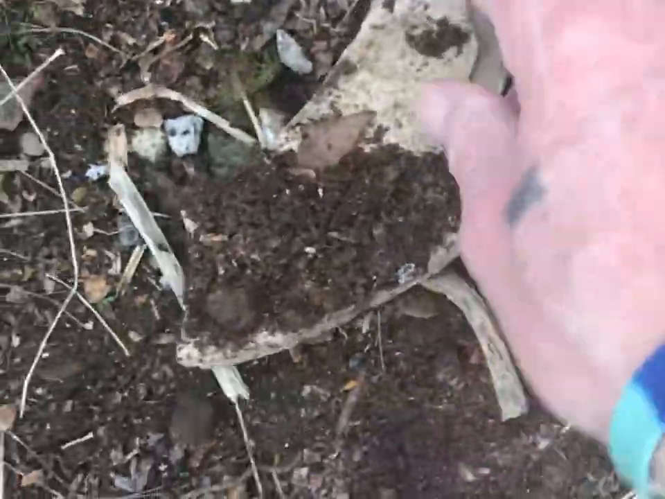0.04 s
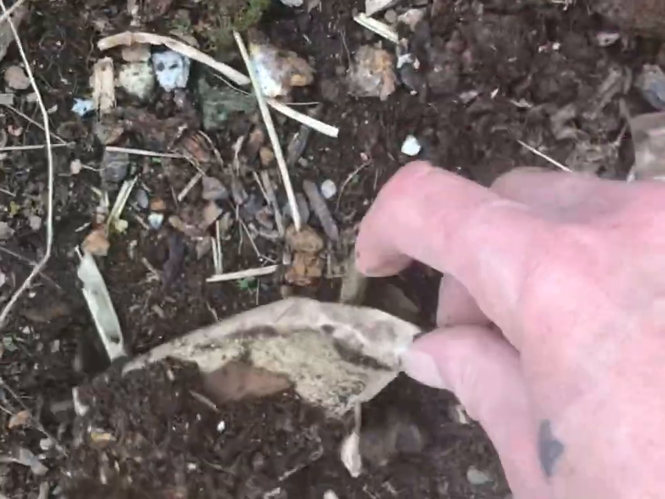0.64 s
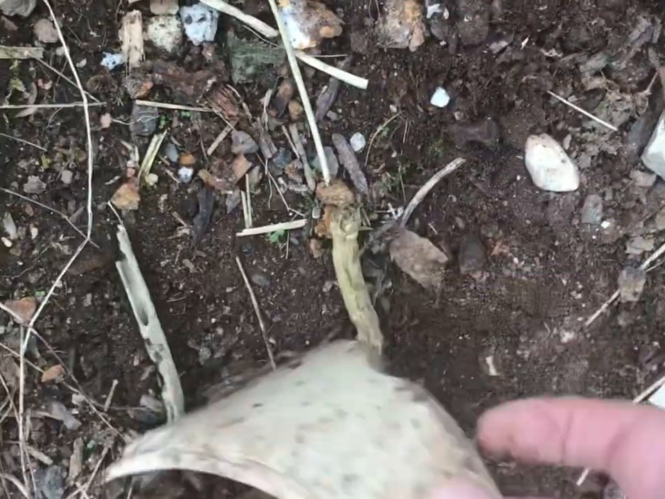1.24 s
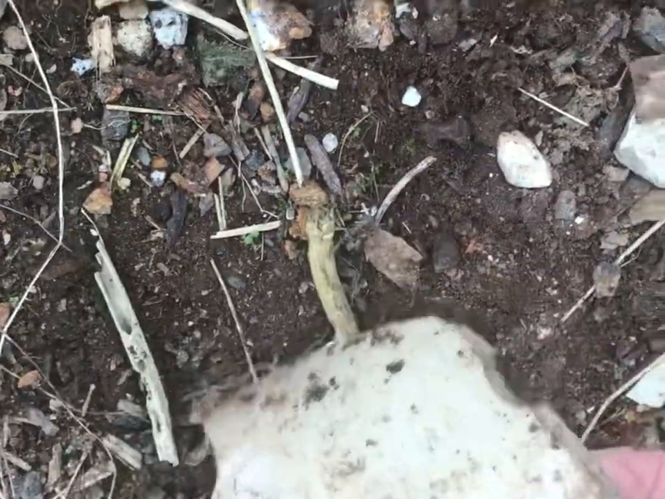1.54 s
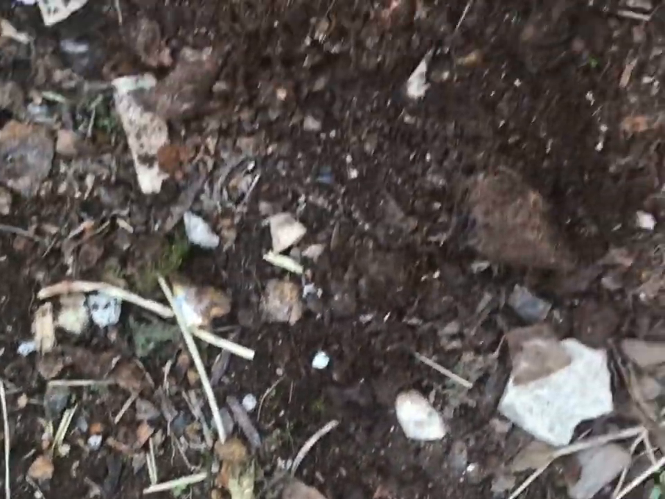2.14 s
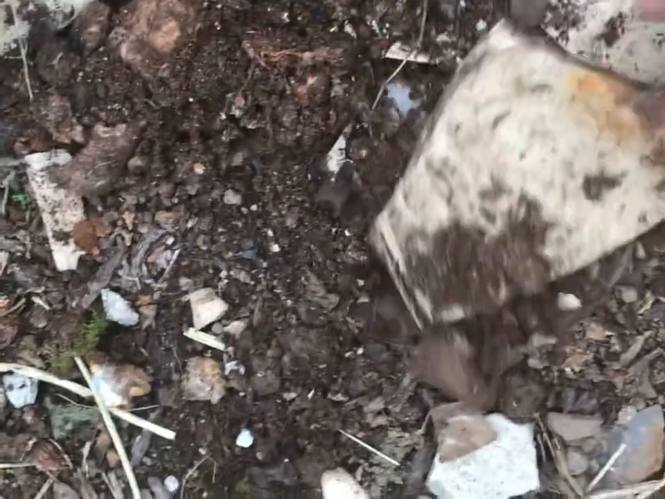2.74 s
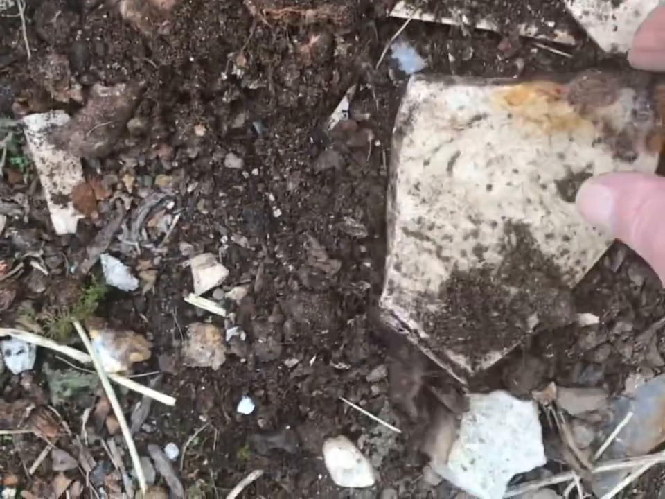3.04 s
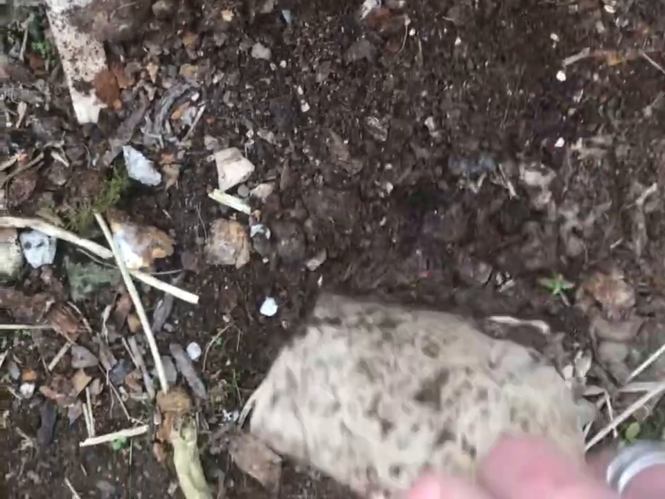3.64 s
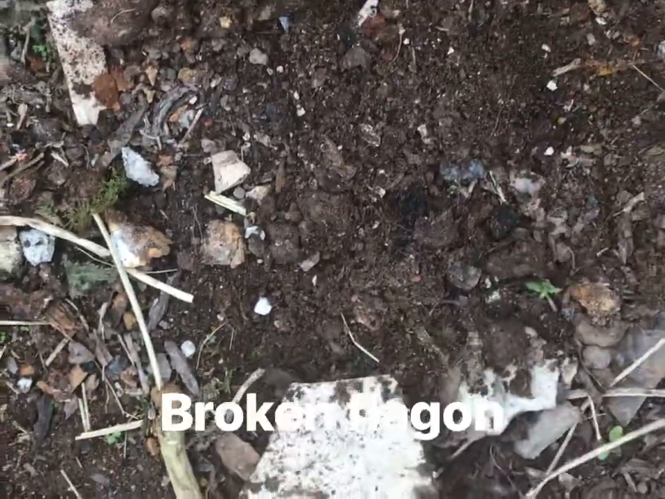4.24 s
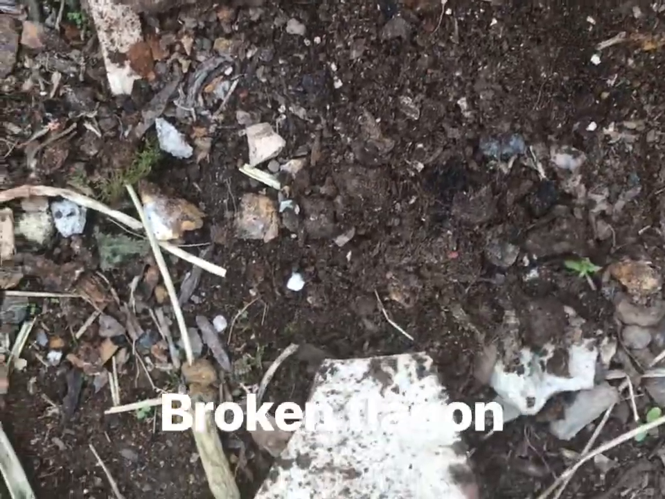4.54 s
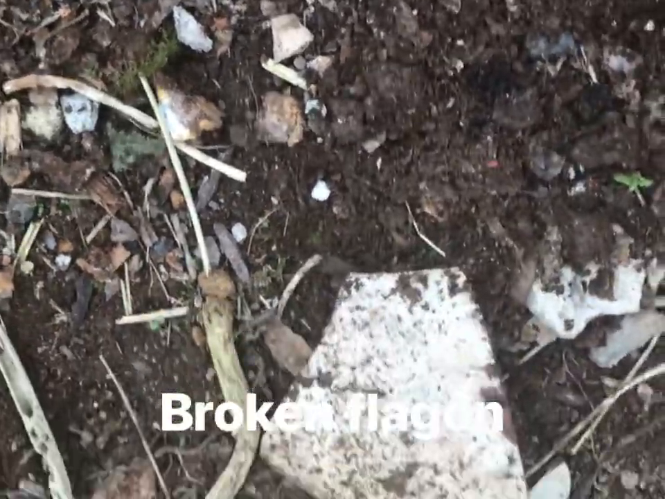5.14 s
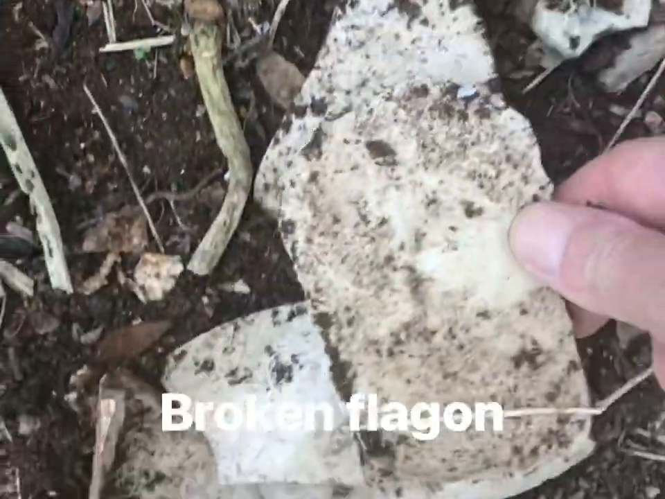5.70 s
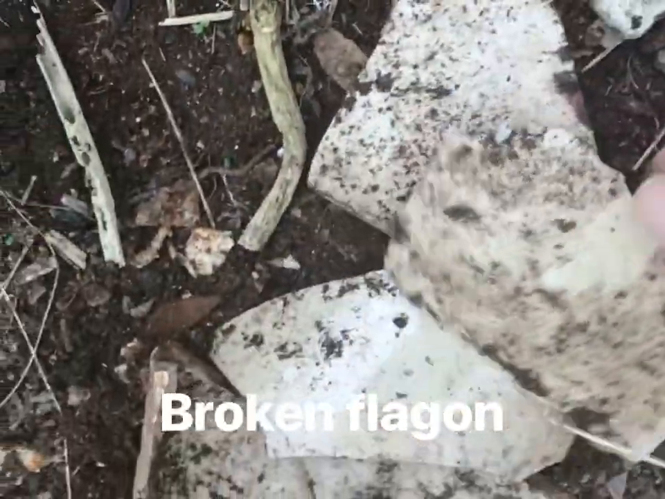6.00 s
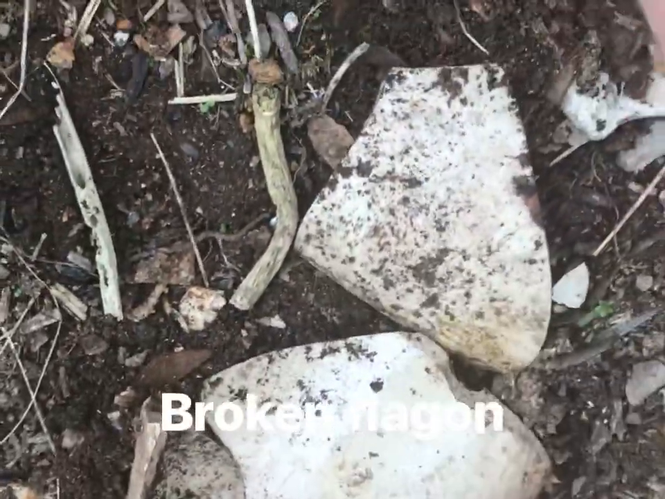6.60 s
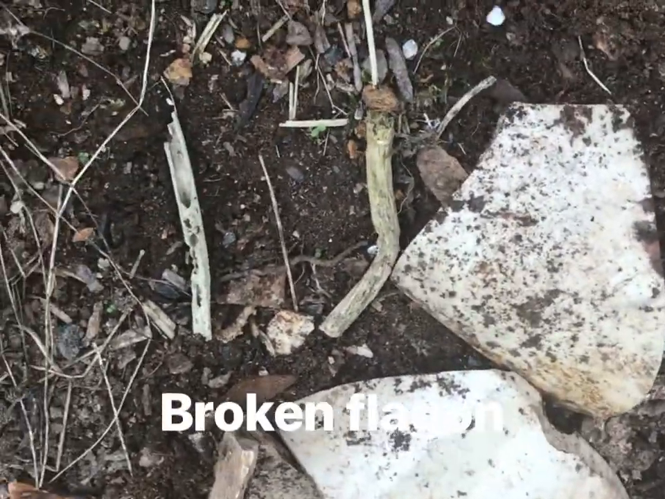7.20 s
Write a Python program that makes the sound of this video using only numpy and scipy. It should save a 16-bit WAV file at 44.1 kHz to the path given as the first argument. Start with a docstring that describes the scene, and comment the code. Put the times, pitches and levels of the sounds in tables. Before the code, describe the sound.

Close, bright clinks of stoneware pieces picked out of garden dirt, with gritty scraping, rustling dry stalks and a short final clatter.

```python
"""In a quiet garden a hand picks four pieces of a broken stoneware jug out of the soil, close by.
First the rim, then a chip, the wall and the belly are knocked and dragged over grit: impact and friction
excite each shard's own modes, while crumbs of earth and dry stalks rustle underneath.
Laid together at the end, the shards clink on one another and one slides off, rattling.
A last rustle of dry litter follows."""
import sys
import numpy as np
from scipy import signal
from scipy.io import wavfile
from scipy.ndimage import map_coordinates

SR = 44100
rng = np.random.default_rng(int(sys.argv[2]) if len(sys.argv) > 2 else 0)


def unload_audio(sound):
    """Save the sound as a 16-bit wav file, at the path given as the first command line argument."""
    columns = np.transpose(np.atleast_2d(sound))
    # keep every value between -1 and 1, then stretch to whole-number steps
    steps = np.round(np.clip(columns, -1, 1) * 32767)
    wavfile.write(sys.argv[1], SR, steps.astype(np.int16))


N = 320166
TIME = np.arange(N) / SR
RING_TIME = np.arange(8192) / SR

# normal modes of each shard, which shift with how it is supported: pitch_hz, level_db, t60_s
SHARD_MODES = { "rim": [(3615, 0, .024), (4200, -10, .008), (5840, -4, .04), (8470, -14, .03),
               (10400, -15, .028), (13500, -24, .02)], "rim, wedged": [(3430, -5, 0.021),
               (4280, 1.5, 0.0096), (6820, -8, 0.018), (8040, -1.5, .022), (12130, -19.5, .02)],
               "rim, gripped": [(2970, 1.5, 0.04), (5770, -5, 0.034), (6460, -12, 0.023)],
               "rim, grounded": [(1083, -15, 0.061), (1800, -8.5, 0.016), (3946, 0.5, 0.034),
               (4830, 5.5, 0.014), (6070, -4.5, 0.019), (8600, -6, 0.02), (10370, -12, 0.014)],
               "wall": [(2690, -10.5, .036), (4030, -8.5, .032), (6150, -3, .026), (6400, 0, .026),
               (9050, -5, .024), (11000, -12, .018), (12200, -9, .022), (14000, -14, .022)],
               "chip": [(2970, -11, .035), (5800, -11, .02), (6200, -8, .026), (6530, 0, .026),
               (10150, -15, .018), (11470, -7, .02), (12190, -18, .02)], "belly": [(4150, 0, .05),
               (4835, -6, .035), (6220, -14, .018), (6560, -17, .02), (9230, -13, .02), (10250, -20, .022),
               (11350, -19, .014)], "belly, sliding": [(4165, 0, .032), (4835, -1, .032), (6210, -6, .028),
               (6580, -7, .026), (9230, -3, .028), (10300, -12, .028), (11280, -11, .02),
               (13500, -14, .026)], "belly, pressed": [(4190, 0, .019), (4800, -5, .014), (9240, -6, .02),
               (10250, -8, .02), (11130, -13, .018)], "flake": [(8020, 0, 0.016)], }
# pushes of each shard over the ground, which both rub the shard and stir the soil:
# start_s, length_s, crest_fraction, rub_db, brightness_db_per_octave, soil_db
SHARD_MOVES = { "rim": [(.004, 0.08, 0.35, -31, -4, -43), (.09, 0.043, 0.7, -39, 5, -52),
               (6.33, 0.15, 0.4, -37.5, 6.5, -48.5)], "rim, gripped": [(.29, 0.38, 0.61, -54, 36, -55),
               (.94, 0.25, 0.3, -52.5, 14, -62)], "chip": [(1.58, 0.23, 0.74, -59, 0, -68),
               (1.825, 0.1, 0.5, -43.5, 0, -52.5), (2.0, 0.076, 0, -53.5, -8, -65),
               (3.87, 0.092, 0, -52, -8, -56)], "wall": [(2.29, 0.12, 0.03, -52.5, -6.5, -66),
               (2.41, 0.072, 0.9, -44, -9, -58), (2.52, 0.32, 0.4, -58.5, -4, -63),
               (2.905, 0.021, 0.36, -53.5, -2.5, -63.5), (3.02, 0.27, 0.12, -56, 0.5, -63),
               (3.5, 0.15, 0.8, -54, -3, -62), (3.69, 0.11, 0.95, -49.5, -1.5, -66)],
               "belly, pressed": [(4.405, 0.26, 0.43, -41.5, -1, -51.5),
               (4.73, 0.068, 0.72, -43, 2.5, -52.5), (4.935, 0.095, 0, -51.5, -14, -70)],
               "belly, sliding": [(5.06, 0.067, 0.5, -56.5, -1, -77), (5.22, 0.43, 0.27, -56, -1, -71),
               (5.925, 0.31, 0.75, -33.5, 0.5, -49.5), (6.27, 0.2, 0.06, -26, -10, -53)], }
# spectrum of the dull knock of a piece being stopped: frequency_hz, level_db
KNOCK_SPECTRUM = [(100, -35), (300, -26.5), (700, -15), (1150, -3), (2200, 0.5), (2700, -2.5),
                  (3700, -18.5), (16000, -54.5)]


def amp(db):
    """Decibels to amplitude ratio."""
    return 10 ** (np.asarray(db) / 20)


def unit(x):
    """Normalisation to an rms of 1."""
    return x / np.sqrt(np.mean(x ** 2) + 1e-20)


def add(mix, start_s, sound):
    """Superposition: a sound joins the mix at start_s."""
    part = mix[max(round(start_s * SR), 0):][:len(sound)]
    part += sound[:len(part)]


def through(x, response):
    """Linear filtering: convolution with an impulse response."""
    return signal.oaconvolve(x, response)[:N]


def click(spectrum, size=4096):
    """Minimum phase: the shortest causal pulse with this spectrum, peak 1."""
    hz, db = np.transpose(spectrum)
    bin_hz = abs(np.fft.fftfreq(size, 1 / SR))
    log_gain = np.log(amp(np.interp(np.log(bin_hz + 1), np.log(hz), db)))
    pulse = np.fft.ifft(np.exp(np.conj(signal.hilbert(log_gain)))).real[:size // 2]
    return pulse / abs(pulse).max()


def grains(per_s, spread_db, limit=3.2):
    """Poisson process: independent impulses of random size and sign."""
    hit = rng.random(N) < per_s / SR
    size = amp(spread_db * np.minimum(rng.exponential(1, N), limit))
    return hit * size * rng.choice([-1, 1], N)


def waver(per_s, depth_db):
    """Random amplitude modulation: a gain that changes about per_s times a second."""
    knots = rng.standard_normal(N // 100)
    return amp(depth_db * np.interp(TIME * per_s, np.arange(len(knots)), knots))


def burst(decay_ms):
    """Exponential decay of a puff of white noise."""
    return rng.standard_normal(len(RING_TIME)) * np.exp(-RING_TIME * 1000 / max(decay_ms, .1))


def push(start, length, crest_fraction, swell_db=9, attack_s=0.023, release_s=0.031):
    """Force envelope of one push of the hand: it takes hold, swells to a crest, eases and lets go."""
    end, crest = start + length, start + length * np.clip(crest_fraction, .02, .98)
    near = (TIME > start - 2 * attack_s) & (TIME < end + 2 * release_s)
    gain, t = np.zeros(N), TIME[near]
    held_db = np.interp(t, [start, crest, end], [-swell_db, 0, -swell_db])
    fade_db = 20 * (np.maximum(start - t, 0) / attack_s + np.maximum(t - end, 0) / release_s)
    gain[near] = amp(held_db - fade_db)
    return gain


def air(level_db=-62):
    """Ambient noise: a low distant rumble and a faint even hiss."""
    # spectrum of the open air: frequency_hz, level_db
    air_spectrum = [(12, -39), (25, -12), (60, 0), (146, -13), (250, -19), (800, -25.5), (2600, -32),
                    (16000, -38)]
    return amp(level_db) * unit(through(rng.standard_normal(N), click(air_spectrum)))


def garden_echoes(x, wet_db=-29, t60_s=0.079, delay_s=0.0074):
    """Scattering: weak echoes from the ground and things nearby follow the direct sound."""
    decay = np.exp(-np.log(1000) * TIME / t60_s) * (TIME > delay_s)
    tail = (grains(per_s=45000, spread_db=-1.5) * decay)[:SR // 2]
    return x + amp(wet_db) * through(x, tail / np.linalg.norm(tail))


def crumbs(sizes=26, decay_cycles=2.2, low_hz=1200, high_hz=15000):
    """Heavily damped oscillators: each size of earth crumb ticks at its own pitch, in its own flurries."""
    out, t = np.zeros(N), RING_TIME[:SR // 200]
    for hz in np.linspace(low_hz, high_hz, sizes):
        tick = np.sin(2 * np.pi * hz * t) * np.exp(-t * hz / decay_cycles)
        ticks = through(grains(per_s=110, spread_db=5.5), tick / np.linalg.norm(tick))
        out += ticks * waver(per_s=50, depth_db=2)
    return unit(out)


def stir(pushes):
    """Incoherent addition: the joint strength of several pushes, whose powers add."""
    return np.sqrt(sum((amp(db) * push(start, length, crest)) ** 2
                       for start, length, crest, *_, db in pushes))


def soil(grit_gain_db=7.0, litter_cutoff_hz=1500):
    """Granular noise: stirred crumbs and sand collide; dry litter sounds thinner and sometimes snaps."""
    # hand or shard brushing the dry litter: start_s, length_s, crest_fraction, level_db
    brushes = [(.14, 0.16, .38, -66), (.66, 0.65, 0.16, -69), (3.36, 0.12, 0.8, -63.5),
               (4.82, 0.097, 0.65, -56.5), (5.07, 0.54, 0.73, -57), (5.6, 0.55, 0.3, -64),
               (6.885, 0.23, 0, -63.5), (7.16, 0.2, 0.19, -58)]
    # crumbs and dry stalks breaking: start_s, level_db, decay_ms
    snaps = [(.445, -27.5, 1.9), (0.795, -34, 1.5), (1.021, -33, 1.8), (1.184, -34, .6), (1.238, -37, 2.5),
             (1.613, -34.5, 4.2), (5.3994, -21, 2.2), (5.447, -44, .6), (5.541, -27.5, 3.1),
             (5.595, -21, 4), (5.776, -33.5, 2.2), (5.798, -24, 4.3), (7.15, -33.5, 4.7)]
    # spectrum of the stirred ground: frequency_hz, level_db
    soil_spectrum = [(100, -31), (300, -9.5), (1000, -8.5), (2300, -9), (5800, -6), (9000, -5.5),
                     (12500, -7.5), (16000, -8)]
    sand = unit(grains(per_s=7000, spread_db=1.5))
    grit = amp(grit_gain_db) * unit((crumbs() + sand) * waver(per_s=170, depth_db=2.6))
    litter = stir(brushes) * grit
    for start, db, decay_ms in snaps:
        add(litter, start, amp(db) * burst(decay_ms) / 2)
    high_pass = signal.butter(1, litter_cutoff_hz, "highpass", fs=SR, output="sos")
    earth = stir(sum(SHARD_MOVES.values(), [])) * grit
    response = click(soil_spectrum)
    return through(earth + signal.sosfilt(high_pass, litter), response / np.linalg.norm(response))


def rasp(gain_db=-5):
    """Friction of rough surfaces: a raw broken edge grates in spurts as its shard is dragged."""
    # shards dragged on a raw broken edge: shard_name
    jagged_shards = ("rim", "belly, pressed")
    # spectrum of the grating edge: frequency_hz, level_db
    rasp_spectrum = [(300, -47), (3000, -6), (4200, -2), (5200, -8.5), (9000, -33)]
    force = sum(amp(rub_db) * push(start, length, crest)
                for shard in jagged_shards for start, length, crest, rub_db, _, _ in SHARD_MOVES[shard])
    spurts = grains(per_s=2300, spread_db=9.0) * waver(per_s=70, depth_db=3.0)
    return amp(gain_db) * force * unit(through(spurts, click(rasp_spectrum)))


def chatter():
    """Intermittent contact: runs of dull ticks and a few hard catches as a shard meets soil or shard."""
    # a dull crunch of soil under a shard, or one edge rattling over another:
    # start_s, length_s, crest_fraction, level_db, knock_pitch_ratio
    tick_runs = [(4.509, 0.023, 0.35, -41, 0.94), (6.157, 0.28, 0.09, -46, 0.64),
                 (6.285, 0.19, 0.3, -35, 0.88)]
    # an edge catching with a dull tick that hardly rings: start_s, peak_db
    catches = [(2.313, -39), (2.409, -44), (3.092, -39.5), (3.9371, -29), (5.011, -43.5), (5.857, -22.5),
               (6.272, -27.5), (6.3121, -12.5), (6.35, -23), (6.364, -22), (6.3985, -18), (6.408, -7),
               (6.4228, -12.5), (6.4377, -34), (6.4675, -35)]
    out, knock = np.zeros(N), click(KNOCK_SPECTRUM)
    for start, length, crest, db, pitch_ratio in tick_runs:
        tick = click([(hz * pitch_ratio, level) for hz, level in KNOCK_SPECTRUM])
        ticks = unit(through(grains(per_s=260, spread_db=2.5), tick))
        out += amp(db) * push(start, length, crest) * ticks
    for start, db in catches:
        add(out, start, amp(db) * knock)
    return out


def ring(shard, brightness, damping=1, spot_db=1.6, spot_detune=.001, brightest_hz=11000):
    """Free vibration: a shard's damped modes, one a row; a harder contact favours the high ones."""
    hz, db, t60 = np.transpose(SHARD_MODES[shard])[:, :, None]
    weight, detune = rng.standard_normal((2, *hz.shape))  # no two contact spots ring alike
    octaves = np.log2(np.minimum(hz, brightest_hz) / hz[0])
    size = amp(db + brightness * octaves + spot_db * weight)
    tones = np.sin(2 * np.pi * hz * (1 + spot_detune * detune) * RING_TIME)
    decay = np.exp(-np.log(1000) * RING_TIME * damping / t60)
    return size / np.linalg.norm(size) * tones * decay


def drags(rub_share=0.42, rise_s=0.00087):
    """Stick-slip excitation: grit catches and slips under a moving shard and drives its modes."""
    out, feeds = np.zeros(N), []
    slips = unit(grains(per_s=900, spread_db=4.0))
    grip = np.minimum(waver(per_s=45, depth_db=7.5), 1.2)  # the edge keeps losing its hold
    # as the contact wanders, each mode is fed in its own fits and starts
    for _ in range(max(map(len, SHARD_MODES.values()))):
        friction = slips + rub_share * rng.standard_normal(N)
        feeds.append(unit(friction * waver(per_s=110, depth_db=3.0) * grip))
    swell = 1 - np.exp(-RING_TIME / rise_s)  # a slip pushes softly, so the ring starts without a click
    for shard, moves in SHARD_MOVES.items():
        for start, length, crest, rub_db, brightness, _ in moves:
            modes = swell * ring(shard, brightness)
            force = push(start, length, crest)
            moving = np.flatnonzero(force)
            for mode, feed in zip(amp(rub_db) * modes / np.linalg.norm(modes), feeds):
                add(out, TIME[moving[0]], signal.fftconvolve(force[moving] * feed[moving], mode))
    drift_s = .0012 * np.log(waver(per_s=20, depth_db=1))  # the pitch drifts slightly
    return map_coordinates(out, [(TIME + drift_s) * SR], order=5)


def clinks(contact_ms=0.79, crunch_ms=2.8, choke_ms=6.87, rough_share=.42,
           light_db=-20, damping_per_db=0.13):
    """Impact excitation: a knock as the piece is stopped, a crunch of grit, then the roughened ring."""
    # blows on each shard: start_s, ring_db, brightness_db_per_octave, knock_db
    blows = { "rim": [(0.0593, -9, -20, -18), (0.0672, -13.5, 3.5, -20), (0.0742, -33, 3, -34),
             (0.1286, -25, -14, -37), (6.2985, -20.5, 8, -54.5), (6.3802, -11, 1.5, -4),
             (6.3908, -8.5, 3, -8.5)], "rim, wedged": [(0.023, -20, -3, -26.5), (0.0309, -10.5, -6, -27),
             (0.0359, -12.5, -7, -27.5), (0.039, -17, -8, -29)], "rim, grounded": [(0.8235, -36, -1, -62),
             (0.8674, -19, 2, -30.5), (0.9046, -24, 1.5, -46), (1.1881, -31.5, 0, -52)],
             "wall": [(2.3553, -31.5, 3, -41.5), (2.4156, -28.5, 15, -34), (2.4299, -22.5, -4, -36),
             (2.4629, -25, 0, -35), (2.654, -27, 2, -65), (2.8353, -32, -1, -64), (3.3946, -32, 4.5, -78),
             (3.8657, -21, -1, -43), (3.9445, -24, -6, -17), (3.993, -21.5, 0.5, -39),
             (5.9183, -27, -1.5, -24), (5.9298, -20.5, -13, -20.5)], "chip": [(1.5491, -26, -2.5, -66.5),
             (1.6137, -25.5, -10, -67), (1.7619, -29, 13, -73), (1.8446, -22, 0, -61),
             (1.866, -21.5, -3.5, -52), (2.0407, -28.5, 17, -58), (3.8425, -33, 0, -50),
             (3.8657, -0.5, 1.5, -8.5), (5.8488, -22.5, -18.5, -55.5)], "belly": [(4.5422, -21.5, 29, -49),
             (4.7259, -22.5, 9.5, -67), (5.8235, -3, 0, -19), (5.8488, -10.5, -3, -13),
             (5.9183, -6.5, 18.5, -22), (6.0079, -7, -5.5, -17), (6.2985, -4.5, -4, -5)],
             "belly, sliding": [(6.0499, -17.5, -5, -33), (6.3765, -12, -7.5, -24.5)],
             "belly, pressed": [(4.566, -23.5, 6, -69), (4.761, -41, 6, -60), (5.9561, -8.5, -12, -53)],
             "flake": [(4.695, -30, 6, -66), (4.7454, -23.5, -2, -62), (4.8001, -24, -17, -66)], }
    # spectrum of grit crunching in the contact: frequency_hz, level_db
    crunch_spectrum = [(200, -17.5), (1200, -12.5), (3000, 1), (16000, -10.5)]
    out, knock, grit = np.zeros(N), click(KNOCK_SPECTRUM), click(crunch_spectrum)
    ms = RING_TIME * 1000
    onset = 1 - np.exp(-ms / contact_ms)
    choke = 1 / (1 + (ms / choke_ms) ** 10)
    for shard, rows in blows.items():
        for start, ring_db, brightness, knock_db in rows:
            crunch = signal.fftconvolve(burst(crunch_ms), grit / np.linalg.norm(grit))
            crunch_db = ring_db - 18 + 0.25 * min(brightness, 10)  # grows with hardness
            damping = 1 + damping_per_db * max(light_db - ring_db, 0)  # a light touch stays in contact
            clean = onset * ring(shard, brightness, damping).sum(0)
            if shard.endswith("pressed"):
                clean = clean * choke
            rough = signal.fftconvolve(clean, crunch)[:len(clean)]
            add(out, start, amp(knock_db) * knock)
            add(out, start, amp(crunch_db) * crunch)
            add(out, start, amp(ring_db) * (clean + rough_share * clean.std() * unit(rough)))
    return out


def scene():
    """Superposition of shards, soil and their echoes in the open air, one channel."""
    direct = clinks() + drags() + rasp() + chatter() + soil()
    return (garden_echoes(direct) + air())[None]


def record(dry, cutoff_hz=15800):
    """Clipping at full scale, then band limiting by a linear-phase low-pass filter."""
    low_pass = signal.firwin(401, cutoff_hz, window=("kaiser", 9), fs=SR)
    return signal.oaconvolve(np.clip(dry, -1, 1), low_pass[None], "same")


dry = scene()
out = record(dry)
unload_audio(out)
```